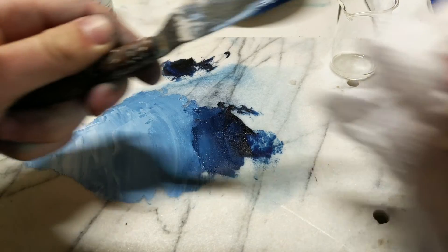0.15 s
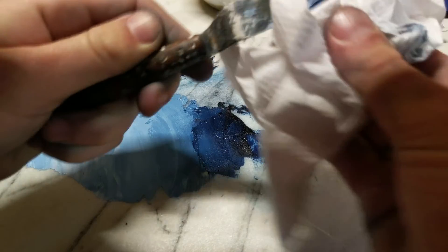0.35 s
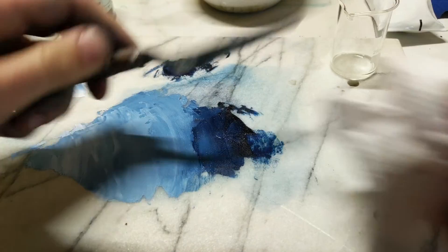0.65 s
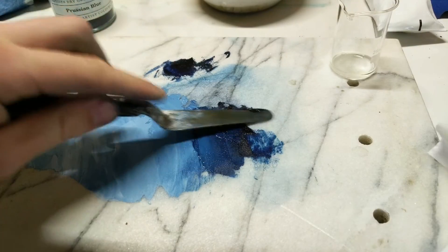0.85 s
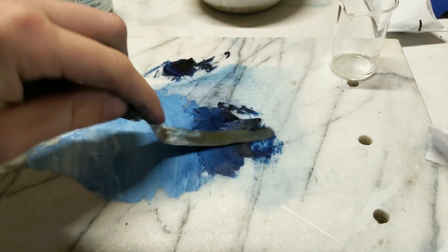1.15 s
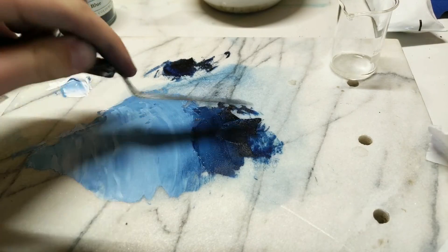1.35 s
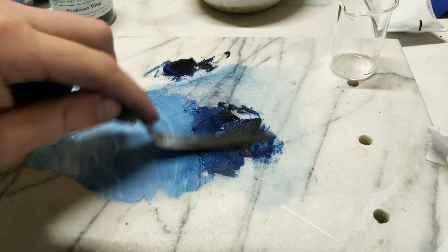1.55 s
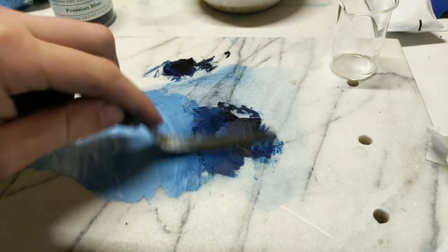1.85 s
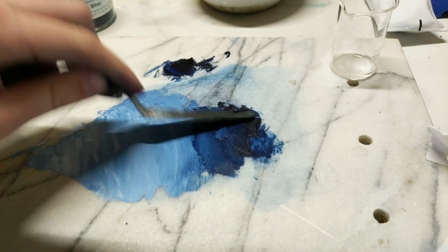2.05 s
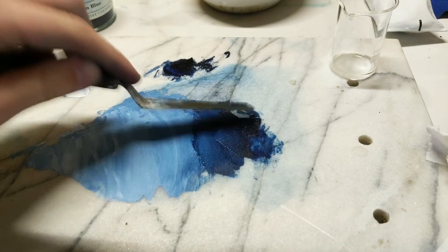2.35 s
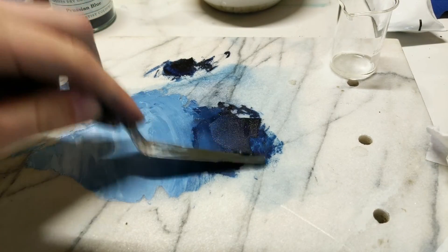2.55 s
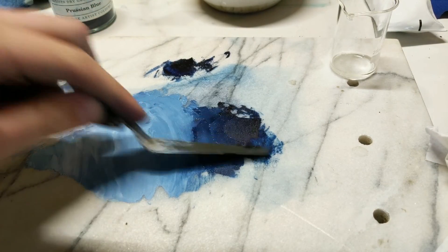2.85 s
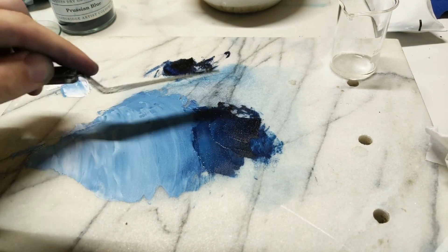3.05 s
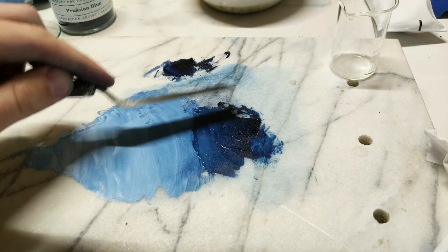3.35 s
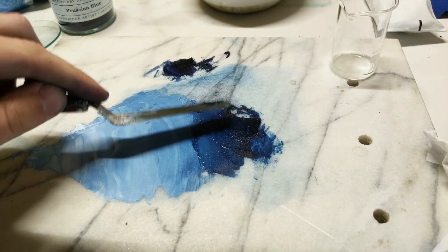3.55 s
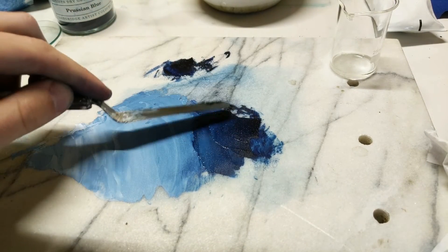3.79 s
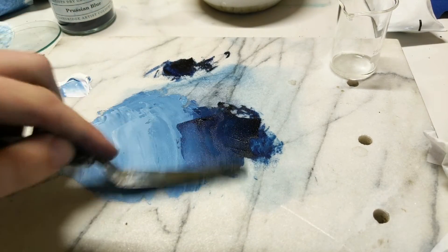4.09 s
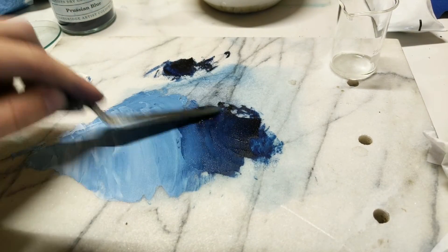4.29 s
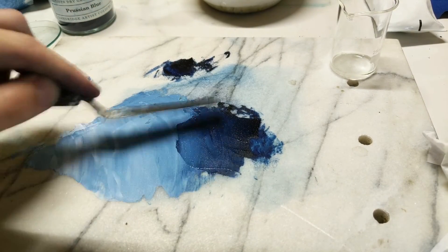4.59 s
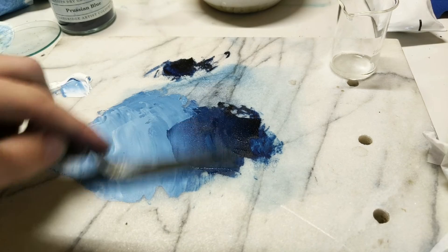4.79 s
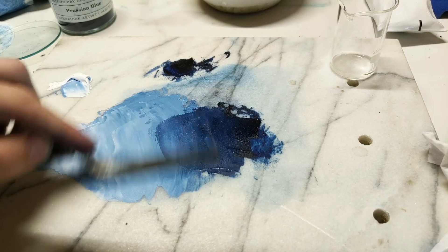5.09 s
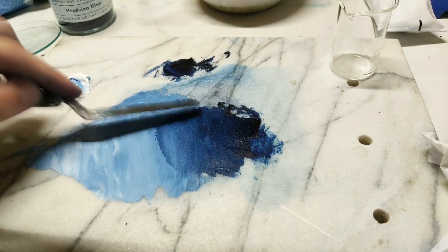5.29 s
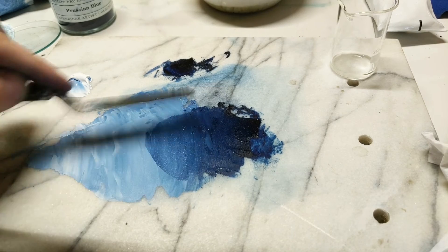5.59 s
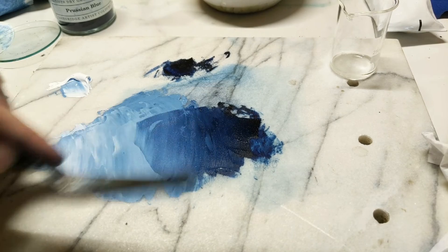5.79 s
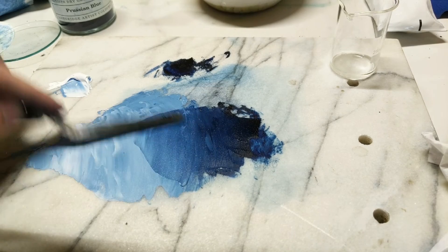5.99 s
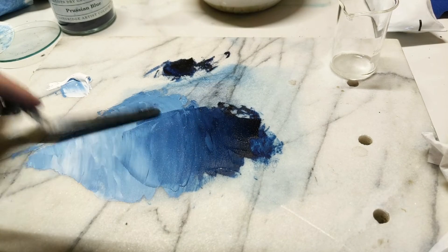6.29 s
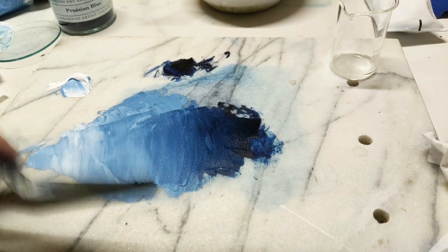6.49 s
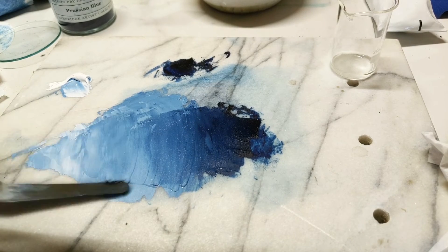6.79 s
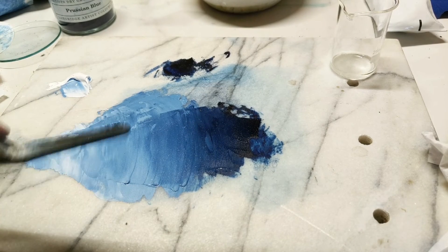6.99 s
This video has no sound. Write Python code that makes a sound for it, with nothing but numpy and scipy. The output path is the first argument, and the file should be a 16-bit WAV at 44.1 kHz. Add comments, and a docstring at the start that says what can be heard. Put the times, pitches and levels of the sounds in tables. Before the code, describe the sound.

A steady low rumble with faint hiss fills a small, nearly dry indoor space, heard through a close small microphone. From 0 to 1.2 s a paper towel is crumpled: dense clumped crackle in uneven bursts, with dry snaps, sharpest around 0.9. A dull thud comes at 1.3 as a thin steel palette knife starts on the stone. Until 2.9 it taps and drags quickly and irregularly, bright damped clinks followed by gritty ringing scrapes and short high hisses. The heaviest deep thud lands at 3.0, its pitch sinking, and the sound ducks. From 3.1 to 3.9 there is only rumble with faint finger rustles and ticks. From 4.0 to 7.1 strokes come about three a second: tap, longer hissy swipe, small tick on lifting. Hisses are strongest near 6.1; low thuds fall around 4.7, 5.0, 5.3, 5.6 and 6.0, with a barely audible squeak at 5.25.

```python
"""In a rumbling room, close to a small microphone, a thin steel palette knife spreads paint over a stone slab.
A paper towel is crumpled first, as dense clumped crackle; then the blade taps, drags and lifts, three times a second.
Taps strike damped blade modes, slipping grit keeps them ringing, and swipes add swells of band-limited hiss.
Dull thuds of sinking pitch come through the table and make the gain control duck."""
import sys
import numpy as np
from scipy import signal
from scipy.io import wavfile
from scipy.ndimage import uniform_filter1d

SR = 44100
rng = np.random.default_rng(int(sys.argv[2]) if len(sys.argv) > 2 else 0)


def generate_wav(sig):
    """Save sig (samples, or channels by samples) to the path in sys.argv[1] as 16-bit PCM at SR."""
    pcm = np.round(np.clip(np.atleast_2d(sig).T, -1, 1) * 32767).astype(np.int16)
    wavfile.write(sys.argv[1], SR, pcm)


N = 314859
STEP = 20   # samples between points of a slow level curve

# blade touching stone: start_s, level_db, treble_db (added to the modes above TREBLE_FROM_HZ)
BLADE_TAPS = [(1.5344, -33, -9.5), (1.8252, -25, -12.5), (1.9604, -42, -7), (2.04, -47.5, 0),
              (2.133, -28.5, -15.5), (2.176, -46, -12), (2.2643, -44.5, -6), (2.314, -28.5, -18),
              (2.3501, -46, -1), (2.4721, -29, -30), (2.581, -40.5, -33), (2.5975, -41.5, -6),
              (2.621, -37, -31), (2.701, -44, -14), (2.812, -25, -12), (2.852, -39, -14),
              (2.9213, -39, -13), (3.9663, -32, -14), (4.3806, -30.5, -25), (4.7329, -25, -16.5),
              (5.0415, -36.5, -31), (5.528, -31.5, -8), (5.7187, -28, -28), (6.0478, -34.5, -30),
              (6.334, -39, -26), (6.357, -34.5, -17), (6.6868, -26.5, -19), (7.015, -32.5, -20),
              (7.0937, -40, -23)]
# bending modes of the free blade: pitch_hz, level_db (relative), t60_s (before contact damping)
BLADE_MODES = [(1784, -14, 0.042), (2090, -9, 0.068), (2290, -17, 0.22), (2892, 4, 0.073),
               (3134, 0.5, 0.13), (3400, 4, 0.062), (3670, -2.5, 0.081), (3820, -5.5, 0.041),
               (4634, -4, 0.022), (5074, 8.5, 0.081), (5187, 4.5, 0.11), (6500, 10, 0.05), (8180, 3, 0.018),
               (9700, -4.5, 0.033), (10500, -3, 0.071), (12100, -3, 0.025), (14500, -23, .03)]
# strokes through the paint: middle_s, half_length_s, hiss_db, hiss_centre_hz, ring_db, ring_later_s
PAINT_SWIPES = [(1.325, 0.039, -67, 8800, -43, 0.029), (1.676, 0.035, -57, 8620, -40, 0.031),
                (1.982, 0.033, -57.5, 8760, -42.5, 0.024), (2.048, 0.017, -64, 6600, -55, 0.0041),
                (2.195, 0.028, -72.5, 9200, -49, 0.001), (2.295, 0.034, -56, 8500, -40.5, 0.022),
                (2.365, 0.015, -61, 7400, -51, -0.0076), (2.527, 0.031, -74, 7810, -50, -0.038),
                (2.611, 0.04, -65, 8300, -48, 0.027), (2.876, 0.039, -64, 7900, -48, 0.0055),
                (2.929, 0.017, -64, 8300, -45.5, 0.017), (4.151, 0.072, -63, 7950, -46, 0.042),
                (4.525, 0.047, -58, 7900, -43.5, 0.025), (4.85, 0.037, -56.5, 7800, -44, 0.02),
                (5.144, 0.059, -61.5, 8250, -43.5, 0.034), (5.483, 0.056, -55, 7850, -41.5, 0.027),
                (5.809, 0.06, -55.5, 8150, -45, 0.044), (6.131, 0.061, -51, 7870, -39.5, 0.024),
                (6.447, 0.072, -52.5, 7550, -44, 0.034), (6.767, 0.064, -56, 7800, -49.5, 0.021),
                (7.094, 0.066, -62, 7600, -48, 0.00011)]
TREBLE_FROM_HZ = 4800   # modes above take a treble level of their own


def from_db(db):
    """Amplitude gain is 10 to the power of decibels over 20."""
    return 10 ** (np.asarray(db) / 20)


def rms_one(x):
    """Normalise the root of the mean power to 1."""
    return x / np.sqrt(np.mean(x ** 2) + 1e-20)


def band_pass(x, order, low_hz, high_hz):
    """A Butterworth resonant band passes one range of frequencies."""
    return signal.sosfilt(signal.butter(order, [low_hz, high_hz], "band", fs=SR, output="sos"), x)


def in_time(rows):
    """Linear interpolation of a curve table's columns, one value per sample."""
    s, *columns = np.transpose(rows)
    return [np.interp(np.arange(N) / SR, s, c) for c in columns]


def sum_of(level_db):
    """Superposition: rows of dB, one value per STEP, add as gains and are interpolated to every sample."""
    total = from_db(level_db).sum(axis=0)
    return np.interp(np.arange(N) / STEP, np.arange(level_db.shape[1]), total)


def drift(rate_hz):
    """Noise through a double-pole low-pass at rate_hz: slow chance with spread 1."""
    step = 40   # samples
    r = np.exp(-2 * np.pi * rate_hz * step / SR)
    noise = rng.standard_normal(N // step + 2002)
    slow = signal.lfilter([1], [1, -2 * r, r * r], noise)[2000:]
    return np.interp(np.arange(N) / step, np.arange(len(slow)), rms_one(slow))


def ring(clicks, hz, t60_s):
    """Damped resonator: a unit click starts a decaying sine of height 1."""
    r, w = from_db(-60 / (t60_s * SR)), 2 * np.pi * hz / SR
    return signal.lfilter([0, np.sin(w)], [1, -2 * r * np.cos(w), r * r], clicks + 1e-18)


def grains(per_s, spread_db, clump_db):
    """Shot noise: random clicks of uneven size, swelling and thinning in clumps; rms 1."""
    sizes = from_db(spread_db * np.minimum(rng.exponential(1, N), 5)) * rng.choice([-1, 1], N)
    present = rng.random(N) < per_s / SR
    return rms_one(sizes * present * from_db(clump_db * drift(47)))


def colour(sources, spectrum, patchy_db=0.0):
    """Third-octave filtering: neighbours get different sources, each band's level drifts; rms 1."""
    out, (at_hz, db) = 0, np.transpose(spectrum)
    edges = 24 * 2 ** np.arange(0, 9.5, 1 / 3)
    for k, (low, high) in enumerate(zip(edges, edges[1:])):
        if high > at_hz[0]:
            band = band_pass(sources[k % 2], 2, low, high)
            level_db = np.interp(np.log(low * high) / 2, np.log(at_hz), db)
            out = out + band * from_db(level_db + patchy_db * drift(2.24))
    return rms_one(out)


def room_tone():
    """Steady broadband noise, its power density shaped by a fixed spectrum and slightly uneven in time."""
    # relative spectrum of the room's rumble and hiss: pitch_hz, density_db (per Hz)
    tone_spectrum = [(15, -56), (25, -49), (48, 0.5), (99, 5), (122, -9.5), (297, -12.5), (349, -16),
                     (389, -15.5), (741, -20.5), (826, -21), (1800, -28.5), (3170, -30.5), (5140, -38.5),
                     (6730, -44), (11000, -54.5), (15500, -55.5)]
    level_db = -42
    return from_db(level_db) * colour(rng.standard_normal((2, N)), tone_spectrum, patchy_db=1.37)


def table_rumble():
    """Random forcing by the working arm excites the table's broad low modes: lumpy low noise."""
    # rumble level curve: time_s, level_db
    rumble_curve = [(0.0, -40.5), (0.71, -44), (1.29, -42.5), (3.16, -43.5), (3.38, -47), (4.04, -49),
                    (4.39, -63), (4.67, -63), (5.01, -53), (5.49, -41.5), (6.4, -50.5), (7.14, -52)]
    noise = band_pass(rng.standard_normal(N + SR), 3, 40, 125)[SR:]   # drops the filter's start
    return from_db(in_time(rumble_curve)[0] + 2.5 * drift(14)) * rms_one(noise)


def thuds():
    """Dispersion of bending waves: highs arrive first, so pitch sinks to a low mode; a soft rebound follows."""
    # blows: start_s, level_db, final_pitch_hz, rebound_db (relative), sink_turns (scale of log phase), held_s
    blows = [(-.012, -25, 57, -15, 0.41, 0.038), (1.316, -21, 44.2, -5.5, 0.24, .033),
             (1.79, -28.5, 47.4, -12, 0.36, 0.029), (2.3937, -19, 48.2, -4.5, 0.36, 0.036),
             (2.7146, -19, 46.5, -10, 0.25, .033), (3.0165, -13.5, 45, -6, 0.25, 0.031),
             (4.684, -26.5, 51.5, -12, 0.32, 0.042), (4.986, -22.5, 52, -17, 0.37, 0.041),
             (5.295, -17, 44.6, -4, 0.346, .044), (5.621, -14.5, 43.5, 0, 0.35, 0.035),
             (5.974, -25.5, 50.3, -9, 0.46, 0.034), (7.011, -34, 47.4, -5, 0.39, 0.035)]
    sink_s, rise_s_per_turn, swell_db_s = 0.001, 0.011, 54   # the slower lows arrive stronger
    first_t60_s, rebound_t60_s = 0.031, 0.16
    rebound_after_s, rebound_rise_s = 0.0463, 0.012
    out, size = np.zeros(N + 2 * SR), SR // 4   # one second of margin at each end
    age = np.arange(size) / SR
    for first_s, first_db, hz, rebound_db, sink_turns, held_s in blows:
        turns = hz * age + sink_turns * np.log(1 + age / sink_s)
        # softer blows start more slowly
        first_rise_s = rise_s_per_turn * sink_turns * from_db(-.6 * (first_db + 18.5))
        first = (first_s, first_db, first_rise_s, first_t60_s)
        rebound = (first_s + rebound_after_s, first_db + rebound_db - 2.0, rebound_rise_s, rebound_t60_s)
        for s, db, rise_s, t60_s in (first, rebound):
            swell_db = swell_db_s * np.minimum(age, held_s)
            decay_db = 60 * np.maximum(age - held_s, 0) / t60_s
            shape = np.minimum(age / rise_s, 1) * from_db(swell_db - decay_db)
            out[SR + round(s * SR):][:size] -= from_db(db) * shape * np.sin(2 * np.pi * turns)
    return band_pass(out, 2, 28, 410)[SR:SR + N]   # the table passes no highs


def room(x):
    """Reverberation as eight recirculating delays of unrelated length, stepped block by block."""
    t60_s = 0.072
    out = np.zeros(N)
    for k, lag in enumerate((rng.uniform(.006, .03, 8) * SR).astype(int)):
        loop, gain = x.copy(), from_db(-60 * lag / SR / t60_s)
        for i in range(lag, N, lag):
            loop[i:i + lag] += gain * loop[i - lag:i][:N - i]
        out += (loop - x) * (-1) ** k
    return out


def towel():
    """Shot noise of crackling fibres, from the towel, later from fingers on the handle; duller when squeezed."""
    # rustles: start_s, length_s, level_db, sag_db (change over the length), tilt_db (lows up, highs down)
    rustles = [(0.037, 0.023, -45.5, -18, 1), (0.1, 0.03, -43.5, -5, 6), (0.174, 0.22, -46.5, -8.5, 3),
               (0.389, 0.16, -40.5, -6.5, 4), (0.643, 0.11, -53.5, -1, 1), (0.759, 0.21, -41.5, 3, 1),
               (1.05, 0.051, -36.5, -1.5, 2.5), (1.184, 0.062, -45, -2.5, 0.5),
               (1.461, 0.076, -59, 14.5, 3), (3.25, 0.11, -60, 4, -1.5), (3.516, 0.054, -58, 4, -3),
               (3.807, 0.081, -53.5, -5, 4)]
    # relative crackle spectrum: pitch_hz, density_db (per Hz)
    crackle_spectrum = [(290, -8), (500, -13), (686, -12.5), (803, -7), (1310, -11), (1750, -5.5),
                        (2160, -0.5), (2900, -2.5), (3530, 0.5), (4310, -10.5), (7670, -24.5),
                        (15500, -104)]
    attack_db_s, release_db_s = 506, 261
    start, length, level_db, sag_db, tilt_db = np.transpose(rustles)[:, :, None]
    age = np.arange(0, N, STEP) / SR - start
    level_db = (level_db + sag_db * np.clip(age / length, 0, 1)
                + attack_db_s * np.minimum(age, 0)
                - release_db_s * np.maximum(age - length, 0))
    sources = [grains(6000, spread_db=3.5, clump_db=2.5) for _ in range(2)]
    crackle = colour(sources, crackle_spectrum, patchy_db=3.5)
    crackle = crackle + from_db(-11) * rms_one(ring(crackle, 3520, .004))   # a short ring on top
    lows = signal.sosfilt(signal.butter(4, 2700, fs=SR, output="sos"), crackle)
    highs = signal.sosfilt(signal.butter(4, 4500, "high", fs=SR, output="sos"), crackle)
    middle = crackle - lows - highs
    return sum_of(level_db + tilt_db) * lows + sum_of(level_db - tilt_db) * highs + sum_of(level_db) * middle


def snaps():
    """Small snaps of towel folds, later ticks of the blade: a dying noise band excites two thin resonances."""
    # small dry snaps and ticks: start_s, level_db, centre_hz
    dry_snaps = [(0.131, -46, 5500), (0.131, -35, 2660), (.38, -37, 3630), (0.51, -40, 3500),
                 (0.7662, -33, 3620), (0.902, -33, 1890), (0.901, -28.5, 4220), (0.934, -51, 10600),
                 (1.050, -32, 2960), (1.124, -33, 4000), (1.662, -46, 10500), (1.733, -34.5, 1260),
                 (1.739, -36, 3770), (2.492, -66, 12000), (2.666, -41.5, 5370), (2.715, -44, 2480),
                 (2.876, -34, 8140), (3.523, -42, 2760), (3.558, -43, 3300), (3.836, -48, 4500),
                 (4.137, -38.5, 8030), (4.494, -39, 8740), (4.523, -38, 9400), (4.849, -30.5, 8000),
                 (4.848, -34, 3700), (5.16, -41, 1380), (5.5079, -37, 10660), (5.765, -27.5, 7470),
                 (5.86, -36, 5330), (6.084, -40, 8500), (6.126, -36, 7200), (7.093, -28.5, 8250)]
    ring_db, ring_t60_s, decay_s = -7.5, .035, 0.0032
    out, size = np.zeros(N), 1800
    chance = rng.standard_normal((len(dry_snaps), size + 2))
    for (s, db, hz), row in zip(dry_snaps, chance):
        burst = row[2:] * np.exp(-np.arange(size) / SR / decay_s)
        burst = band_pass(burst, 3, hz / 1.3, min(hz * 1.19, 20000))
        rings = sum(ring(burst, hz * (.93 + 0.039 * off), ring_t60_s) for off in row[:2])
        burst = burst / np.abs(burst).max() + from_db(ring_db) * rings / np.abs(rings).max()
        out[round(s * SR):][:size] += from_db(db) * burst[:N - round(s * SR)]
    return out


def squeak():
    """Frequency modulation: a faint wavering tone of the edge sinks in pitch while it swells and fades."""
    # one squeak: start_s, length_s, level_db, from_hz, to_hz
    edge_squeak = (5.24, .14, -62, 3480, 3310)
    start, length, db, from_hz, to_hz = edge_squeak
    share = np.clip((np.arange(N) / SR - start) / length, 0, 1)
    pitch_hz = from_hz + (to_hz - from_hz) * share + 25 * drift(65)
    turns = np.cumsum(pitch_hz) / SR
    swell = np.sin(np.pi * share) ** .5
    return from_db(db + 2.9 * drift(30)) * swell * np.sin(2 * np.pi * turns)


def swipes():
    """Friction noise: each swipe swells as grit hiss, focused in a band set by how the blade lies."""
    grit, out = [grains(5000, spread_db=1.0, clump_db=5.5) for _ in range(2)], 0
    middle, half, level_db, centre_hz = np.transpose(PAINT_SWIPES)[:4, :, None]
    # treble fall, dB at an octave above centre: -29 for a -59.5 dB swipe of vanishing length,
    # steeper for louder swipes (2 dB per dB) and for longer ones (300 dB per second of half length)
    fall_db = -29 - 2 * (level_db + 59.5) - 300 * half
    past = (np.arange(0, N, STEP) / SR - middle) / half
    # the exponents make the onset more abrupt than the end
    swell_db = level_db - 11.5 * np.abs(past) ** np.where(past < 0, 3.5, 2.3)
    edges = np.geomspace(4200, 16000, 24)
    for k, (low, high) in enumerate(zip(edges, edges[1:])):
        octaves = np.log2(np.sqrt(low * high) / centre_hz)
        below_db = np.maximum(-90 * octaves ** 2, -14)
        above_db = fall_db * np.abs(octaves) ** 1.31
        gain = sum_of(swell_db + np.where(octaves < 0, below_db, above_db))
        band = band_pass(grit[k % 2], 2, low, high)
        out = out + gain * from_db(3.3 * drift(25)) * rms_one(band)
    return out


def pressure():
    """Contact force sets friction level: the edge bears just after each tap, then through each swipe until it lifts."""
    slide_db, slide_fade_db_s = -19, 216    # the edge slides on: relative to the tap, and its fading
    press_rise_db, press_fall_db = 6.5, 14.5   # per half length of a swipe
    t = np.arange(0, N, STEP) / SR
    tap_s, tap_db, _ = np.transpose(BLADE_TAPS)[:, :, None]
    slides_db = np.where(t >= tap_s, tap_db + slide_db - slide_fade_db_s * (t - tap_s), -200)
    middle, half, _, _, ring_db, later = np.transpose(PAINT_SWIPES)[:, :, None]
    past = (t - middle - later) / half
    # last tap before the swipe; a swipe ahead of all taps is not gated
    landed = tap_s[np.maximum(np.searchsorted(tap_s[:, 0], middle[:, 0]) - 1, 0)]
    press_db = ring_db + np.minimum(press_rise_db * past, -press_fall_db * past)
    presses_db = np.where((t >= landed) | (landed > middle), press_db, -200)
    return sum_of(slides_db) + sum_of(presses_db)


def drag():
    """Stick-slip excitation: pigment grit slips under the edge and rings the paint-damped blade."""
    slips = grains(5000, spread_db=3.0, clump_db=1.6)
    damping, treble_db = .27, -22   # paint and stone shorten the ring
    blade = 0
    for hz, db, t60_s in BLADE_MODES:
        mode_db = db + treble_db * (hz > TREBLE_FROM_HZ) + 3.8 * drift(37) + 3.1 * drift(5.2)
        blade = blade + from_db(mode_db) * ring(slips, hz, damping * t60_s)
    return pressure() * rms_one(blade)


def taps():
    """Impact excitation: a quick patter of contacts rings modes that the bent blade splits into close clusters."""
    damping, crack_db, crack_s = .6, -9.5, 0.0015
    start_s, tap_db, treble_db = np.transpose(BLADE_TAPS)
    at, out, size = np.round(start_s * SR).astype(int), np.zeros(N), 800
    spans, age = at[:, None] + np.arange(size), np.arange(size) / SR
    modes = [(hz * split, db, t60_s) for hz, db, t60_s in BLADE_MODES for split in (.991, 1, 1.011)]
    chance_db = 3.0 * rng.standard_normal((len(at), len(modes)))
    patter = from_db(-24.0) * rng.standard_normal((len(at), size)) * np.exp(-age / 0.01)
    patter[:, 0] = 1   # the first contact
    for k, (hz, db, t60_s) in enumerate(modes):
        clicks = np.zeros(N + size)
        level_db = tap_db + db - 20.5 + treble_db * (hz > TREBLE_FROM_HZ) + chance_db[:, k]
        np.add.at(clicks, spans, from_db(level_db)[:, None] * patter)
        out += (-1) ** (k // 3) * ring(clicks[:N], hz, damping * t60_s)   # sign alternates by cluster
    # dry click of steel on stone
    crack = rng.standard_normal((len(at), size)) * np.exp(-age / crack_s)
    crack = band_pass(crack, 2, 1500, 6000)
    np.add.at(out, np.minimum(spans, N - 1), from_db(tap_db + crack_db)[:, None] * crack)
    return out


def scene():
    """Superposition of hands and blade with their room, the table, and the steady room tone."""
    near = towel() + snaps() + drag() + swipes() + taps() + squeak()
    reverberation = from_db(-7.5) * room(near)
    return (near + reverberation + thuds() + table_rumble() + room_tone())[None]


def record(dry):
    """Dynamic compression: gain ducks on loud sound and recovers at a steady rate; then the top is cut."""
    duck_above_db, duck_slope = -31, 0.56   # slope: dB of cut per dB above
    recover_db_s, attack_s, cutoff_hz = 41.5, 0.021, 15900
    power = uniform_filter1d(dry ** 2, size=880, axis=1)
    level_db = 10 * np.log10(power + 1e-12) + 3   # peak level of a sine
    ramp = recover_db_s * np.arange(N) / SR
    cut_db = duck_slope * np.maximum(level_db - duck_above_db, 0)
    held_db = np.maximum.accumulate(cut_db + ramp, axis=1) - ramp
    r = np.exp(-1 / (attack_s * SR))
    smooth_db = signal.lfilter([1 - r], [1, -r], held_db)
    out = dry * from_db(-smooth_db)
    return signal.sosfilt(signal.cheby2(24, 50, cutoff_hz, fs=SR, output="sos"), out)


dry = scene()
out = record(dry)
generate_wav(out)
```